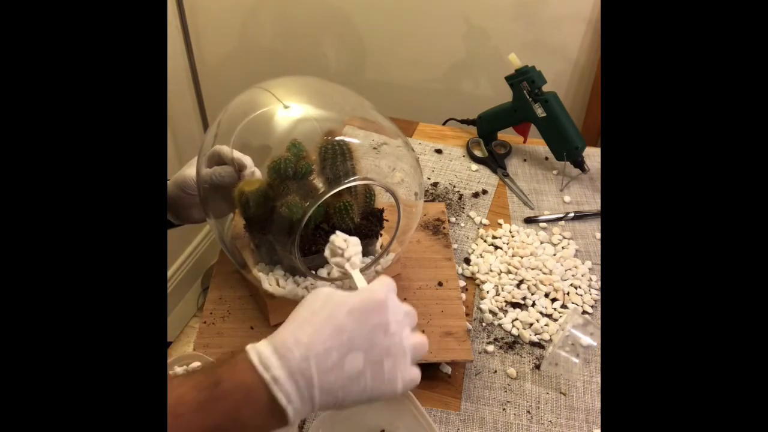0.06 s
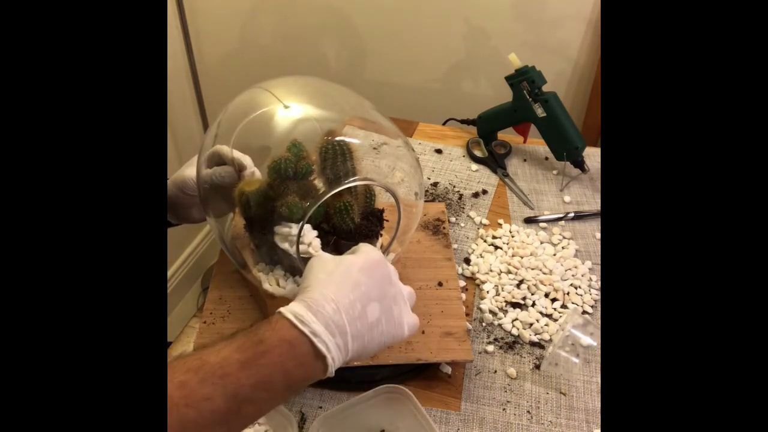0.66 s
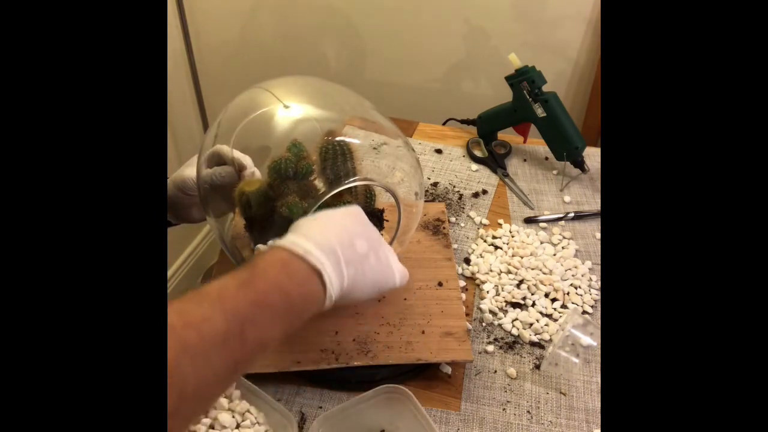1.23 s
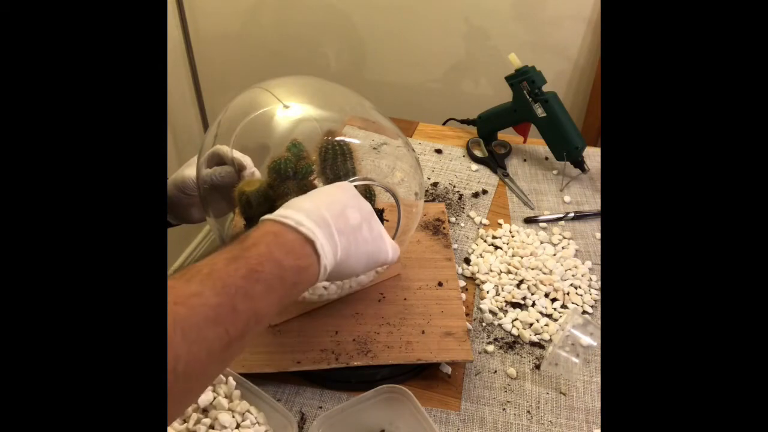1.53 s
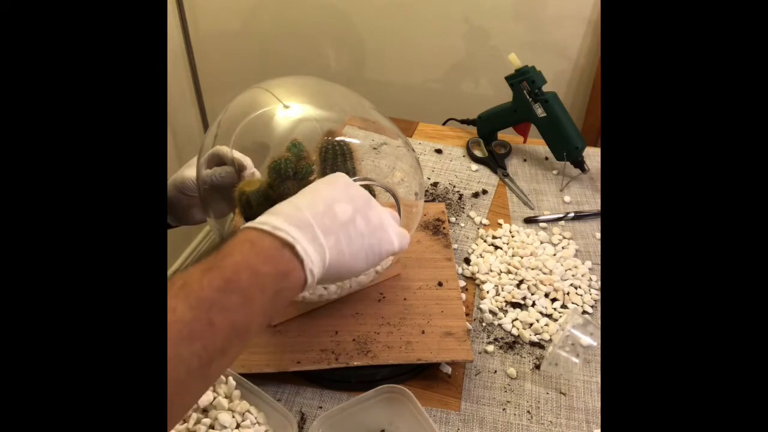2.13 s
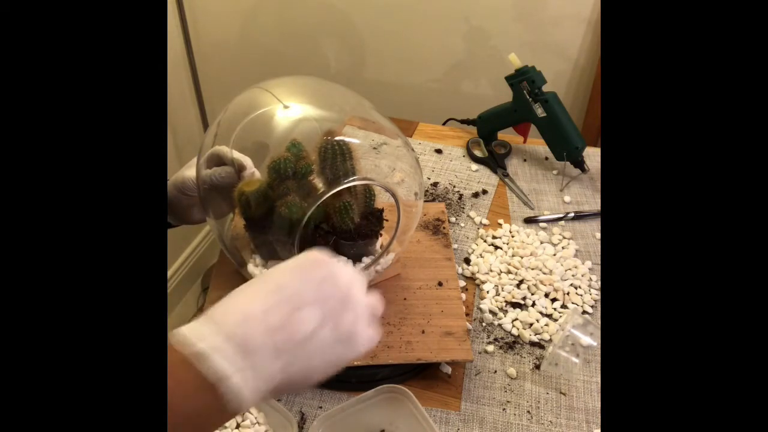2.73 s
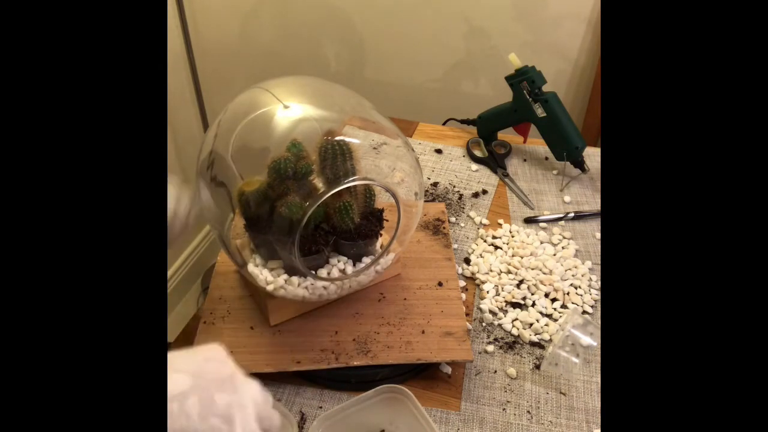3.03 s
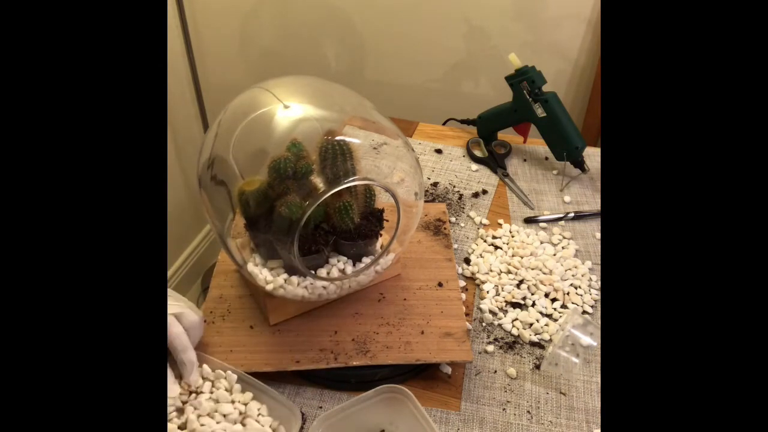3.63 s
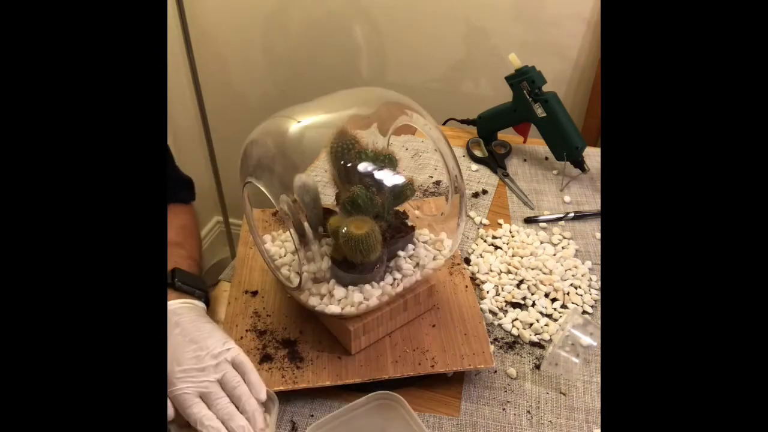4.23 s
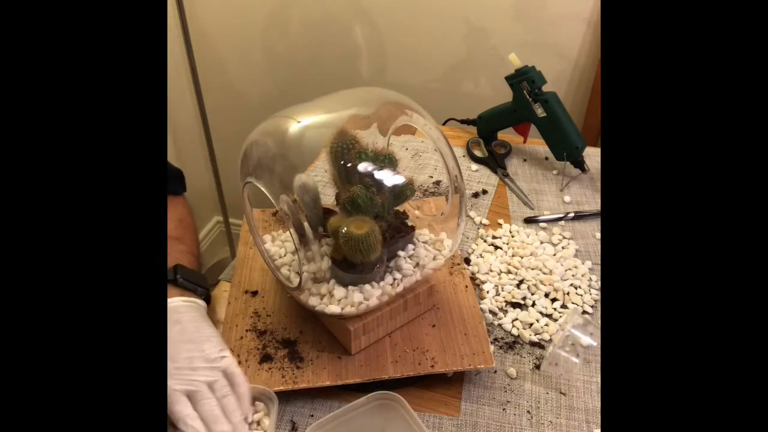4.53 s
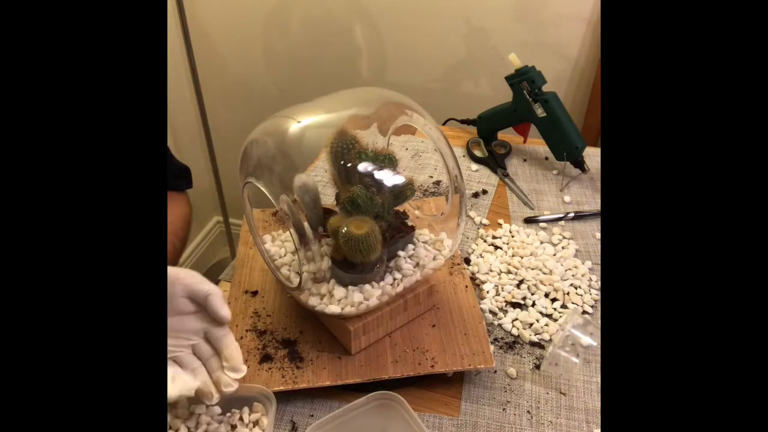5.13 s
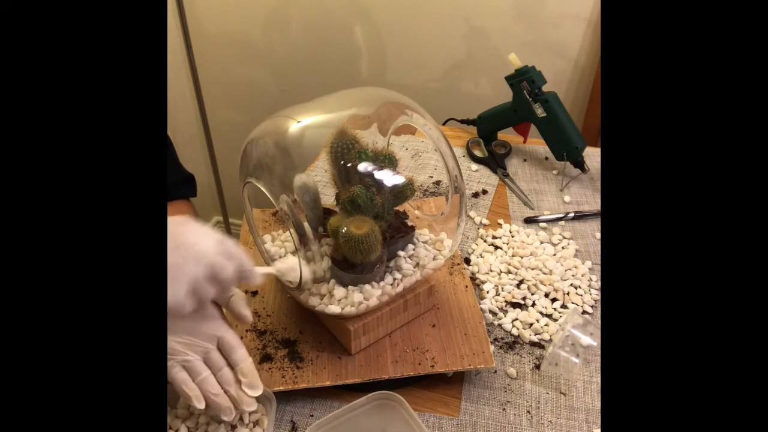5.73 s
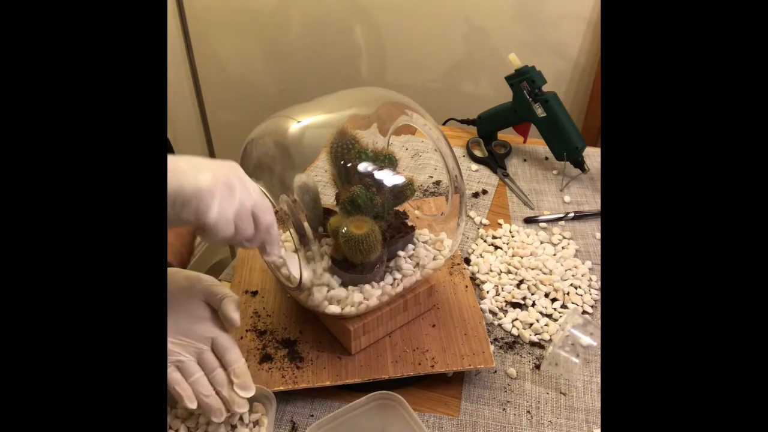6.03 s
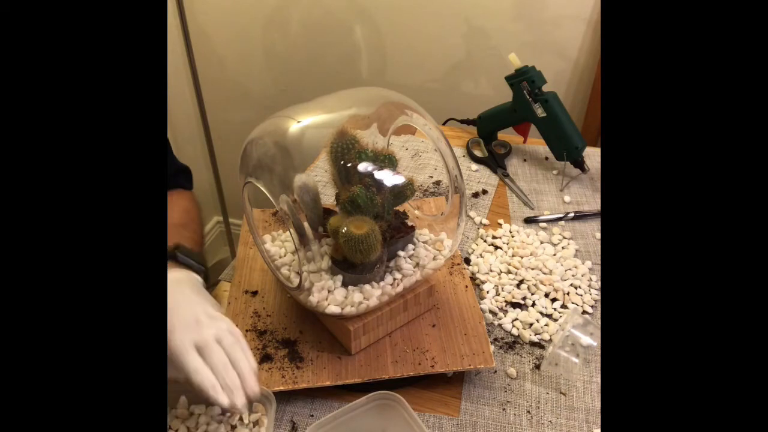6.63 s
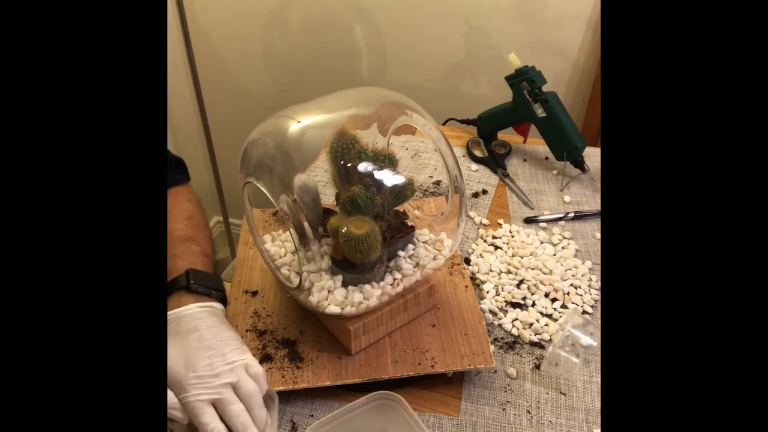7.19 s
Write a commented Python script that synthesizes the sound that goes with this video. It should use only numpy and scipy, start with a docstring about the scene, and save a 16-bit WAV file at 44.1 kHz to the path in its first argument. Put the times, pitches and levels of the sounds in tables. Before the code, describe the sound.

Heard up close in a small room, little stones clatter and clink into a glass bowl. After a few spoon taps and a light scrape, pebbles rattle and crunch as they are scooped inside a plastic tub, with soft thuds underneath. The spoon chatters briefly against the glass rim, then ploughs through the stones again. A faint mains hum runs throughout.

```python
"""Spooning pebbles into a glass bowl

Close by in a small room, pebbles drop and trickle into a bowl on a wooden board and set the glass ringing.
The spoon taps the wall, scrapes out, then digs through a plastic tub of pebbles: a dense crunch of stone
contacts that rings the tub, with a few taps on the glass rim in between. A faint mains hum lies below."""
import sys
import numpy as np
from scipy import signal
from scipy.fft import rfft, irfft
from scipy.io import wavfile
from scipy.ndimage import uniform_filter1d

SR = 44100
rng = np.random.default_rng(int(sys.argv[2]) if len(sys.argv) > 2 else 0)


def pcm_store(signal):
    """Save signal as 16-bit PCM."""
    levels = np.round(np.clip(np.atleast_2d(signal), -1, 1) * 32767)
    wavfile.write(sys.argv[1], SR, levels.astype(np.int16).T)


N = 328883
TIME = np.arange(N) / SR

# strokes that dig to the tub's bottom or lift the load: t/s, rise/s, hold/s, level/dB, low boost/dB
DIG_STROKES = [(4.078, .005, .03, -41.5, -6.5), (4.11, 0.017, 0.11, -29, -1.5),
               (4.223, 0.04, 0.044, -25, -1.5), (4.339, 0.016, 0.081, -39, 5.5),
               (4.446, 0.041, 0.21, -38, 5.5), (4.727, 0.017, .17, -42.5, 1.5),
               (5.027, 0.036, 0.14, -60, 9.5), (5.76, 0.044, 0.085, -47, -7.5), (6.581, .01, 0.073, -51, 2),
               (6.632, 0.054, 0.15, -39, 3), (6.747, 0.026, 0.012, -35, 1), (6.91, 0.019, 0.15, -44.5, 1.5),
               (7.044, 0.053, 0.056, -27, -2), (7.137, 0.039, 0.094, -26.5, 2),
               (7.288, 0.021, 0.16, -39.5, 6)]


def undb(db):
    """Decibels to gain."""
    return 10 ** (np.asarray(db) / 20)


def unit(x):
    """Scale to rms 1."""
    return x / np.sqrt(np.mean(x ** 2))


def peak(x):
    """Scale to peak 1."""
    return x / np.abs(x).max()


def even(x):
    """Hold the short-time rms at 1, so that the hand's effort alone sets the level."""
    return x / np.sqrt(uniform_filter1d(x ** 2, size=1800) + 1e-12)


def add(out, start_s, x):
    """Mix x into out from start_s on."""
    i = int(start_s * SR)
    out[i:i + len(x)] += x[:max(N - i, 0)]


def fade(t, t60):
    """Exponential decay, 60 dB down after t60 seconds."""
    return np.exp(-np.log(1000) * t / t60)


def colour(x, points, size=2048):
    """Minimum-phase EQ through points of f/Hz, level/dB."""
    hz, db = np.transpose(points)
    log_hz = np.log(np.fft.rfftfreq(size, 1 / SR) + 1)
    gain = undb(np.interp(log_hz, np.log(hz), db))
    cepstrum = irfft(np.log(gain))
    cepstrum[1:size // 2] *= 2
    cepstrum[size // 2 + 1:] = 0
    impulse = irfft(np.exp(rfft(cepstrum)))
    return signal.oaconvolve(x, impulse)[:len(x)]


def band(x, hz, kind, order=4):
    """Butterworth filter."""
    return signal.sosfilt(signal.butter(order, hz, kind, fs=SR, output="sos"), x + 1e-18)


def resonate(x, hz, width_hz):
    """One resonance, gain 1 at its centre."""
    return signal.lfilter(*signal.iirpeak(hz, hz / width_hz, fs=SR), x + 1e-18)


def crack(t, hz, t60, skirt_db):
    """Stone contact: a brief noise burst, strongest around hz (the harder, the higher)."""
    burst = rng.standard_normal(len(t)) * fade(t, t60)
    near_db, far_db = -skirt_db / 2, -2 * skirt_db
    x = colour(burst, [(hz / 10, far_db), (hz / 2, near_db), (hz, 0), (hz * 2, near_db), (hz * 10, far_db)])
    return x / np.sqrt(np.sum(x ** 2))


def contacts(per_s, spread_db, t60, low_hz, high_hz, pitches=24):
    """Stones jostling: random knocks, few large and many small, shared among stones of different pitch."""
    t = np.arange(SR // 50) / SR
    out = np.zeros(N)
    for hz in np.geomspace(low_hz, high_hz, pitches):
        strength = undb(spread_db * np.minimum(rng.exponential(size=N), np.log(100)))
        struck = rng.random(N) < per_s / pitches / SR
        knocks = struck * strength * rng.choice([-1, 1], N)
        # higher knocks spread over a wider band, so they carry more energy
        out += np.sqrt(hz) * signal.oaconvolve(knocks, crack(t, hz, t60, skirt_db=15))[:N]
    return out


def effort(moves, fall_db_per_s, swell_db=19):
    """Envelope of overlapping movements: each swells, holds and dies away; their powers add."""
    power = np.zeros(N)
    for start_s, rise_s, hold_s, db, *_ in moves:
        t = np.arange(int((rise_s + hold_s) * SR) + SR) / SR
        attack_db = swell_db * np.maximum(1 - t / rise_s, 0)
        release_db = fall_db_per_s * np.maximum(t - rise_s - hold_s, 0)
        add(power, start_s, undb(db - attack_db - release_db) ** 2)
    return np.sqrt(power)


def stir(rattle, moves, fall_db_per_s, treble_db, low_hz, high_hz):
    """Play a rattle by effort: the treble keeps a fixed share, deeper movements add lows."""
    low = even(band(rattle, low_hz, "low"))
    mid = even(band(rattle, [low_hz, high_hz], "band"))
    high = even(band(rattle, high_hz, "high"))
    low_moves = [(*timing, db + boost_db) for *timing, db, boost_db in moves]
    body = effort(low_moves, fall_db_per_s) * low
    return body + effort(moves, fall_db_per_s) * (mid + undb(treble_db) * high)


def background():
    """Still room air and mains hum."""
    # spectrum of the air: f/Hz, level/dB
    air_spectrum = [(15, -33.5), (25, -10.5), (53, -8), (123, -10), (161, -11), (180, -11.5), (229, -8),
                    (335, -12.5), (416, -10.5), (659, -16.5), (962, -19.5), (1230, -23.5), (5570, -32),
                    (16000, -43)]
    # tones of the hum: f/Hz, rms level/dB
    hum_tones = [(50, -66.5), (100, -71), (150, -72), (230, -70)]
    air = undb(-60.5) * unit(colour(rng.standard_normal(N), air_spectrum, size=8192))
    hum = sum(undb(db) * np.sin(2 * np.pi * (hz * TIME + rng.random())) for hz, db in hum_tones)
    return air + np.sqrt(2) * hum


def tub_ring(x):
    """The short, hollow ring of the plastic tub."""
    # tub resonances: f/Hz, width/Hz, level/dB
    modes = [(566, 50, -4.5), (907, 54, -0.5), (957, 34, 5), (1024, 77, 6), (1190, 38, -4.5), (1255, 69, 4),
             (1315, 10, -0.5), (1590, 230, -14), (2330, 40, -15), (2240, 110, -14.5)]
    return sum(undb(db) * resonate(x, hz, width_hz) for hz, width_hz, db in modes)


def snaps():
    """A jammed pebble slips free: a hard tick of stone on stone and a knock that rings the plastic."""
    # pebbles snapping against spoon and tub: t/s, knock level/dB, knock f/Hz, tick level/dB
    single_snaps = [(1.1873, -30, 3450, -35), (3.043, -25.5, 2460, -19.5), (3.13, -28, 3140, -25.5),
                    (3.2729, -33, 1200, -52), (3.3116, -30, 2170, -38), (3.4635, -15, 2100, -15),
                    (3.6368, -6.5, 2120, -37), (3.9531, -24, 1760, -53), (4.1152, -23, 3100, -27),
                    (4.1236, -9.5, 3500, -32), (4.1335, -9, 2020, -30), (4.1495, -10, 2200, -21),
                    (4.2, -11, 2940, -5), (4.2676, -18, 3600, -25), (4.414, -11.5, 1790, -16),
                    (4.4337, -12.5, 1020, -20), (4.6168, -24, 1400, -23), (4.724, -16, 2500, -24),
                    (4.754, -20.5, 990, -28), (4.7788, -20, 2310, -19), (4.8605, -15, 2050, -24),
                    (4.9296, -26.5, 2420, -18), (5.025, -28, 2060, -16.5), (5.063, -22, 2070, -24.5),
                    (5.0925, -19, 1880, -22), (5.1072, -26, 2030, -28), (5.16, -23.5, 2020, -23),
                    (5.1971, -22.5, 2220, -37), (5.3097, -27, 2300, -18.5), (5.3203, -29, 3120, -34),
                    (5.3471, -29, 1690, -56), (5.528, -33.5, 1630, -41), (5.5622, -28, 2170, -26.5),
                    (5.6691, -36, 2480, -37), (5.748, -28.5, 2000, -53), (5.8792, -41, 3390, -26),
                    (6.588, -12.5, 2230, -15.5), (6.7204, -14.5, 2020, -36), (6.8204, -16, 2900, -16.5),
                    (6.8378, -11.5, 3000, -17), (6.9798, -21.5, 2350, -15), (7.0339, -9.5, 2630, -13),
                    (7.105, -22, 2700, -9), (7.1265, -16, 2600, -18), (7.1643, -7, 1800, -11),
                    (7.206, -2.5, 3080, -8), (7.3797, -15.5, 1090, -20)]
    t = np.arange(SR // 20) / SR
    knocks, ticks = np.zeros((2, N))
    for start_s, knock_db, hz, tick_db in single_snaps + slips():
        add(knocks, start_s, undb(knock_db) * peak(crack(t, hz, t60=.007, skirt_db=16)))
        add(ticks, start_s, undb(tick_db) * peak(crack(t, hz=11500, t60=.0045, skirt_db=16)))
    return band(knocks + undb(-2.5) * tub_ring(knocks), 700, "high", order=3) + ticks


def trickle(bowl_modes):
    """Small stones roll over each other and keep the glass ringing."""
    # spectrum of stones on glass: f/Hz, level/dB
    spectrum = [(470, -41.5), (800, -22.5), (1290, -17.5), (1630, -21), (1810, -16.5), (2130, -27),
                (2730, -28.5), (3800, -10), (4800, -12), (6170, -5), (6910, -3.5), (8230, 2), (10600, -4.5),
                (12900, -2), (16000, -10.5)]
    # runs of pebbles sliding into the bowl: t/s, rise/s, hold/s, level/dB, low boost/dB
    spills = [(1.307, 0.0073, 0.032, -46.5, -3.5), (1.351, .008, 0.013, -24.5, -16.5),
              (1.417, .02, .05, -38.5, -12), (1.475, .015, 0.21, -41, -10), (1.751, 0.027, 0.12, -43, -3),
              (2.106, .005, .005, -51, 1), (2.205, 0.057, 0.035, -38.5, -0.5),
              (2.302, 0.022, 0.074, -33.5, -10), (2.53, 0.013, 0.036, -49, -1),
              (2.615, 0.024, 0.04, -52.5, -9), (2.774, 0.043, 0.0078, -51.5, -2.5)]
    stones = contacts(per_s=1500, spread_db=3.1, t60=.008, low_hz=1500, high_hz=13000)
    stones = colour(stones, spectrum)
    # a mode's bandwidth follows from its decay time
    ring = sum(undb(db) * resonate(stones, hz, np.log(1000) / np.pi / t60) for hz, db, t60 in bowl_modes)
    rattle = unit(stones) + undb(-12) * unit(ring)
    return stir(rattle, spills, fall_db_per_s=152.5, treble_db=-7, low_hz=2820, high_hz=6410)


def glass_hits(blows, modes, crack_db, crack_t60, skirt_db):
    """Each blow cracks and rings the glass; where it lands sets each mode's share and exact pitch."""
    t = np.arange(SR // 2) / SR
    out = np.zeros(N)
    hz, db, t60 = np.transpose(modes)[:, :, None]
    for start_s, level_db, bright_hz in blows:
        share = undb(db + 2 * rng.standard_normal(hz.shape)) * rng.choice([-1, 1], hz.shape)
        detuned_hz = hz * (1 + .003 * rng.standard_normal(hz.shape))
        ring = np.sum(share * np.sin(2 * np.pi * detuned_hz * t) * fade(t, t60), axis=0)
        ring /= np.sqrt(np.sum(ring ** 2))
        attack = undb(crack_db) * crack(t, bright_hz, crack_t60, skirt_db)
        add(out, start_s, undb(level_db) * peak(ring + attack))
    return band(out, 1000, "high", order=2)


def pour():
    """Pebbles clink into the bowl one by one while smaller stones trickle around them."""
    # pebbles landing: t/s, level/dB, brightness/Hz
    landings = [(1.3175, -28, 5000), (1.337, -17, 8650), (1.3592, -8, 7460), (1.3635, -20.5, 6100),
                (1.3845, -22, 6300), (1.438, -13, 8000), (1.5163, -7.5, 8000), (1.611, -20, 9000),
                (1.632, -17, 9700), (1.6573, -13, 9000), (1.6653, -16, 8800), (1.795, -20, 6400),
                (1.876, -25, 6360), (1.961, -21, 6250), (2.1165, -24, 8000), (2.2367, -28, 3730),
                (2.262, -18, 6840), (2.3235, -13, 5750), (2.364, -19, 6200), (2.397, -26, 6060),
                (2.413, -22, 4270)]
    # modes of the glass bowl: f/Hz, level/dB, t60/s
    modes = [(3450, -7, .05), (3600, -6, .06), (3720, -3, .17), (3850, -6, .05), (4054, -5, .09),
             (4170, -6, .1), (5352, -13, .12), (5725, -7, .13), (5872, -7, .13), (6048, -6, .1),
             (6123, -3, .15), (6292, -5, .12), (6336, -6, .12), (7240, -9, .04), (8050, -10, .04),
             (9152, -10, .05)]
    return glass_hits(landings, modes, crack_db=5, crack_t60=.03, skirt_db=17) + trickle(modes)


def board_rumble():
    """The wooden board rumbles dully as the bowl is leaned on."""
    # spectrum of the board: f/Hz, level/dB
    spectrum = [(53, -45.5), (90, -20), (141, 1), (177, -10), (302, -1), (437, -9), (700, -13.5),
                (910, -40), (1540, -120)]
    # leans on the bowl: t/s, rise/s, hold/s, level/dB
    leans = [(1.8, .03, 0.17, -54), (2.1, 0.013, 0.015, -55.5), (2.2, 0.024, 0.17, -55),
             (2.52, 0.02, 0.045, -56), (2.75, 0.016, 0.024, -58.5)]
    return even(colour(rng.standard_normal(N), spectrum)) * effort(leans, fall_db_per_s=158)


def wall_taps():
    """The spoon knocks the inner wall and briefly rings the glass."""
    # taps on the wall: t/s, level/dB, brightness/Hz
    taps = [(2.0775, -20, 3280), (2.1107, -25.5, 3570), (2.1933, -30.5, 3450), (2.5651, -30, 1870),
            (2.602, -15.5, 3850)]
    # modes of the struck wall: f/Hz, level/dB, t60/s
    modes = [(1846, 0.5, 0.037), (2310, -4.5, 0.03), (2515, -7.5, 0.14), (2550, -3.5, 0.066),
             (3420, 3.5, 0.048), (3520, -38.5, .25), (4270, -22, 0.09), (5280, -5, 0.051),
             (6160, -20, 0.058), (7130, 1.5, 0.025), (8400, -15, .05), (9440, -11, 0.066)]
    return glass_hits(taps, modes, crack_db=-3, crack_t60=.048, skirt_db=16)


def spoon_scrape():
    """The emptied spoon scrapes over the rim: friction hisses in resonances that sink as it is drawn out."""
    # scraping strokes: t/s, rise/s, hold/s, level/dB
    strokes = [(2.62, .06, .02, -45.5), (2.79, 0.074, 0.025, -52.5), (2.89, .05, .05, -51)]
    # resonances of the sliding spoon: ratio to its pitch, width/Hz, level/dB
    modes = [(0.569, 217, -7.5), (1.002, 45, 1), (1.6, 215.5, 1.5), (2.55, 500, -1.5)]
    start_hz, sink_hz_per_s = 1930, 720
    drawn_s = np.clip(TIME - strokes[0][0], 0, .5)
    phase = 2 * np.pi * np.cumsum(start_hz - sink_hz_per_s * drawn_s) / SR
    hiss = np.zeros(N)
    for ratio, width_hz, db in modes:
        flutter = unit(band(rng.standard_normal(N), width_hz / 2, "low", order=2))
        hiss += undb(db) * flutter * np.sin(ratio * phase)
    grit = contacts(per_s=1500, spread_db=2.5, t60=.003, low_hz=1000, high_hz=5000, pitches=8)
    grit = band(grit, 4000, "low", order=2)
    return (unit(hiss) + undb(-5.5) * unit(grit)) * effort(strokes, fall_db_per_s=252)


def crunch(strokes, spectrum, contacts_per_s, ring_db, fall_db_per_s):
    """Pebbles pushed by the spoon crunch together and knock the tub."""
    stones = contacts(contacts_per_s, spread_db=3.3, t60=.005, low_hz=500, high_hz=12000)
    stones = colour(stones, spectrum)
    rattle = stones + undb(ring_db) * tub_ring(stones)
    return stir(rattle, strokes, fall_db_per_s, treble_db=-9.5, low_hz=2740, high_hz=7210)


def scoop():
    """The spoon skims the loose top layer: a busy rattle with little ring from the tub."""
    # shallow strokes: t/s, rise/s, hold/s, level/dB, low boost/dB
    strokes = [(3.04, 0.017, 0.022, -34.5, 0.5), (3.305, 0.0047, 0.005, -43, 4.5),
               (3.335, 0.029, 0.011, -41, 2.5), (3.385, 0.04, .02, -37.5, 5.5),
               (3.435, 0.025, 0.019, -23, -1.5), (3.51, .02, 0.15, -48, 6.5),
               (3.675, 0.004, 0.015, -29.5, 0.5), (3.89, 0.045, 0.0049, -46.5, 3.5)]
    # spectrum of loose pebbles: f/Hz, level/dB
    spectrum = [(150, -47.5), (300, -14), (480, -16.5), (620, -9), (820, -16), (1100, -8.5), (1550, -0.5),
                (2000, -7), (3000, -12.5), (5000, -12.5), (8000, -21.5), (10300, -24), (12000, -22),
                (16000, -26.5)]
    return crunch(strokes, spectrum, contacts_per_s=2400, ring_db=-12, fall_db_per_s=231.5)


def dig():
    """The spoon ploughs to the bottom: a fuller crunch that rings the tub harder."""
    # spectrum of pebbles deep in the tub: f/Hz, level/dB
    spectrum = [(100, -18), (200, -3), (400, -7), (580, -3), (750, -2.5), (950, -4), (1300, -3), (2200, -2),
                (2800, -6), (3800, -3.5), (5500, -5), (7500, -9), (10300, -9.5), (11500, -9), (16000, -14)]
    return crunch(DIG_STROKES, spectrum, contacts_per_s=1700, ring_db=-6, fall_db_per_s=261)


def slips(per_s=20, slices=400):
    """Cues for small pebbles snapping at random during a dig, scaled to the stroke that frees them."""
    cues = []
    for start_s, rise_s, hold_s, stroke_db, _ in DIG_STROKES:
        slipped = rng.random(slices) < per_s * hold_s / slices
        scatter = rng.standard_normal((slices, 3))
        for k in np.flatnonzero(slipped):
            knock_scatter, pitch_scatter, tick_scatter = scatter[k]
            slip_s = start_s + rise_s + hold_s * k / slices
            knock_db = stroke_db + 7.5 + 3.5 * knock_scatter
            knock_hz = 1700 * np.exp(.3 * pitch_scatter)
            tick_db = stroke_db + 8 + 3.5 * tick_scatter
            cues.append((slip_s, knock_db, knock_hz, tick_db))
    return cues


def hand_bumps():
    """The hand bumps tub and table: low, damped thuds with a soft attack."""
    # bumps: t/s, level/dB, f/Hz
    bumps = [(4.129, -48, 75), (4.755, -43, 400), (5.387, -50.5, 108), (5.439, -48, 65.4),
             (6.599, -37.5, 326), (6.716, -42, 248), (7.371, -39, 86.5), (7.413, -44, 125)]
    t = np.arange(SR // 4) / SR
    envelope = fade(t, t60=.049) - fade(t, t60=.0094)
    out = np.zeros(N)
    for start_s, db, hz in bumps:
        thud = np.sin(2 * np.pi * hz * t) * envelope
        add(out, start_s, undb(db) * thud / thud.max())
    return out


def rim_taps():
    """The spoon chatters against the glass rim in bright clinks."""
    # taps on the rim: t/s, level/dB, brightness/Hz
    taps = [(5.9184, -12, 5720), (5.9444, -23.5, 5300), (5.9654, -24, 3300), (5.9998, -17, 5640),
            (6.0397, -24.5, 5200), (6.0791, -25.5, 5100), (6.1094, -32.5, 3260), (6.1968, -36, 1585)]
    # modes of the struck rim: f/Hz, level/dB, t60/s
    modes = [(1750, -7, .025), (3290, -6, .12), (3400, -3, .045), (5170, 2, .07), (7220, 0, .035),
             (9255, -7, .04), (11310, -11, .025)]
    return glass_hits(taps, modes, crack_db=-.5, crack_t60=.046, skirt_db=6.5)


def room(x, wet_db, t60, treble_t60, onset_s):
    """Table and near walls answer almost at once; the treble dies first."""
    t = np.arange(SR * 2 // 3) / SR
    low, high = rng.standard_normal((2, len(t)))
    body = band(low, 7600, "low", order=2) * fade(t, t60)
    treble = band(high, 10000, "high", order=2) * fade(t, treble_t60)
    tail = (body + treble) * np.clip(t / onset_s - .5, 0, 1)
    tail /= np.sqrt(np.sum(tail ** 2))
    return x + undb(wet_db) * signal.oaconvolve(x, tail)[:N]


def scene():
    """Bowl, tub and table in one room; the level dips sharply for an instant at four seconds."""
    bowl = pour() + wall_taps() + rim_taps() + spoon_scrape()
    tub = scoop() + dig() + snaps()
    table = board_rumble() + hand_bumps()
    mix = room(bowl + tub + table, wet_db=-4.5, t60=.46, treble_t60=.36, onset_s=.00042) + background()
    dip = np.interp(TIME, [3.96, 4, 4.015, 4.07, 4.08], [1, .02, .3, .5, 1])
    return (dip * mix)[None]


def record(dry):
    """The recorder drops the deepest bass, rounds the sharpest peaks and cuts the top."""
    bottom_hz, top_hz, drive = 40, 16000, 1.4
    rounded = np.tanh(drive * band(dry, bottom_hz, "high", order=5)) / drive
    return signal.sosfilt(signal.ellip(10, .2, 80, top_hz, fs=SR, output="sos"), rounded)


dry = scene()
out = record(dry)
pcm_store(out)
```